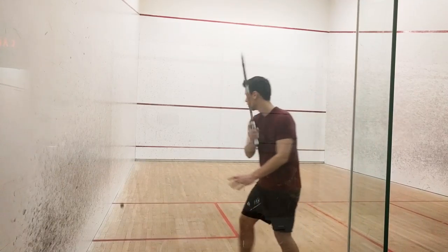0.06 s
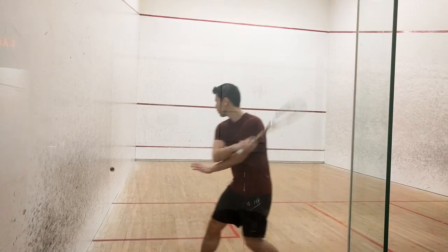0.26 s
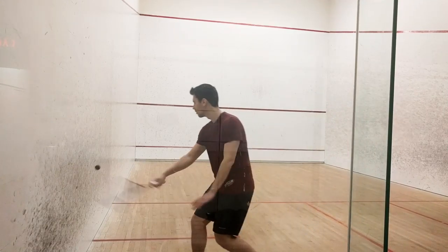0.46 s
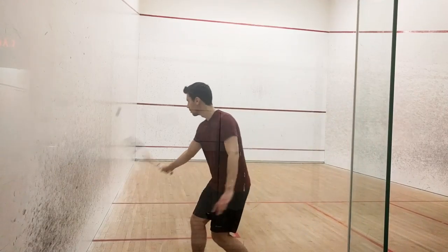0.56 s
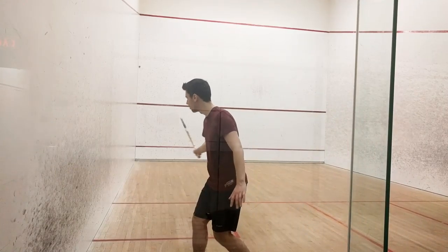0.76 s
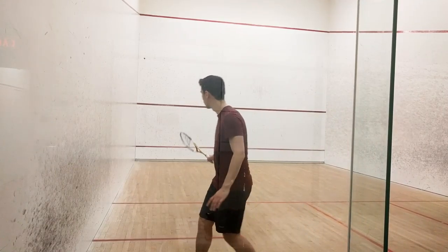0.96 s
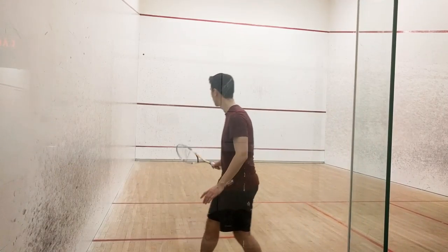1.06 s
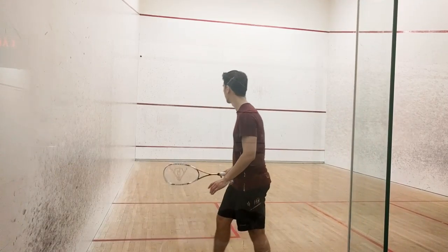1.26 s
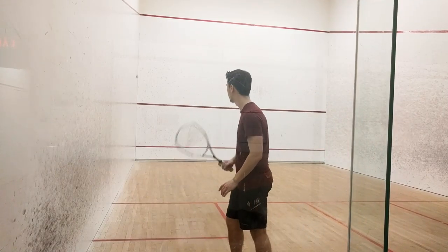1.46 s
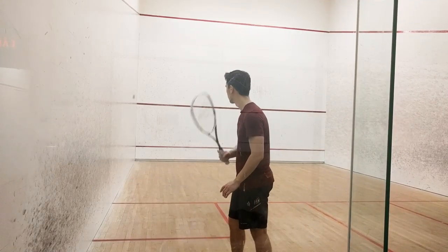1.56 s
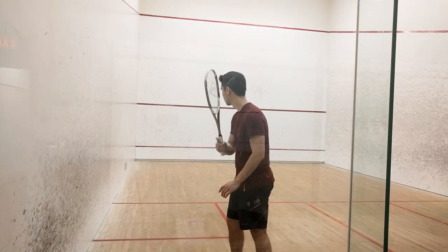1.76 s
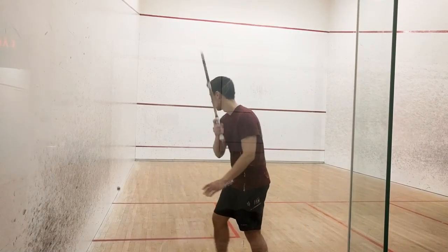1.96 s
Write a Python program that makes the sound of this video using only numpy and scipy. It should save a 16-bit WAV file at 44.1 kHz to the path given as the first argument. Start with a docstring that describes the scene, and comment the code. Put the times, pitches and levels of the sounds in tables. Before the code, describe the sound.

A squash ball ticks off the floor, is hit by a stringed racket, then cracks loudly against the front wall; soft footfalls between, long bright reverberation, faint ventilation, heard in mono from inside the hard court.

```python
"""A squash rally in a hard, closed court, two seconds long, over ventilation and the last shot dying away.
The ball bounces on the floor with a hard tick just after; two footfalls and a push of air follow.
A racket drives the ball, its strings ping, and the ball slams into the front wall. A shoe scuffs faintly,
then comes one more step and a second bounce. Each ball impact is a damped low swing (thump) plus a
sharp noisy edge (crack), with a ring of many reflections; most have distinct early echoes as well."""
import sys
import numpy as np
from scipy import signal
from scipy.fft import rfft, irfft
from scipy.io import wavfile

SR = 44100
rng = np.random.default_rng(int(sys.argv[2]) if len(sys.argv) > 2 else 0)


def waveform_to_disk(signal):
    """Save audio, clipped to [-1, 1], as 16-bit WAV at the path in sys.argv[1]."""
    frames = np.transpose(np.atleast_2d(signal))
    scaled = np.clip(frames, -1, 1) * 32767
    samples = np.round(scaled).astype(np.int16)
    wavfile.write(sys.argv[1], SR, samples)


N = 88200  # length of the scene [samples]


def undb(db):
    """Turn decibels into a plain multiplier."""
    return 10 ** (np.asarray(db) / 20)


def unit(x):
    """Scale a sound to an average (RMS) level of 1."""
    return x / np.sqrt(np.mean(x ** 2))


def fade(t, t60):
    """Decay by 60 dB in t60 seconds."""
    return np.exp(-np.log(1000) * np.maximum(t, 0) / t60)


def hump(t, centre_s, width_s):
    """A smooth rise and fall."""
    return np.exp(-.5 * ((t - centre_s) / width_s) ** 2)


def along(points, hz):
    """Read (frequency [Hz], value) points on a log-frequency axis."""
    p = np.array(points, float)
    return np.interp(np.log(np.maximum(hz, 1)), np.log(p[:, 0]), p[:, 1])


def colour(x, points):
    """Filter to the given (frequency [Hz], level [dB]) shape, without any sound ahead of its cause."""
    size = 2 * N
    shape = undb(along(points, np.fft.rfftfreq(size, 1 / SR)))
    # Folding the cepstrum onto its first half gives a minimum-phase filter
    cepstrum = irfft(np.log(shape))
    cepstrum[1:N] *= 2
    cepstrum[N + 1:] = 0
    response = np.exp(rfft(cepstrum))
    return irfft(rfft(x, size) * response)[:N]


def delay(x, s):
    """Start a sound s seconds later."""
    return np.concatenate([np.zeros(max(int(s * SR), 0)), x])[:N]


def ball():
    """Each impact pushes and cracks the air; nearby surfaces echo it and the far end answers within the ring."""
    # ball impacts: (time [s], what is hit, thump pitch [Hz], thump damping t60 [s], thump level [dB],
    # crack level [dB], ring level [dB], build-up of the ring [s])
    impacts = [(.1166, "floor", 195, .014, -21.5, -10.5, -33, 0.027),
               (0.6292, "racket", 288, 0.01, -20.5, -10, -35, 0.029),
               (1.0765, "wall", 431, 0.0046, -11, -2, -24, 0.016),
               (1.9825, "floor", 217, .01, -26, -9.5, -29.5, .018)]
    # early echoes off the nearest surfaces, levels relative to the impact before them:
    # (time [s], thump level [dB], crack level [dB])
    echoes = [(0.1315, 1, -30), (0.1513, -24, -20), (0.1643, -9, -17), (0.1905, -7, -18), (0.652, -7, -17),
              (0.6912, -10.5, -21), (1.085, -9, -10.5), (1.1, -10, -23), (1.0985, -29, -8),
              (1.1157, -9, -23), (1.1325, -27, -35), (1.1430, -19, -12)]
    # colour of the ring in the court, by what is hit: (frequency [Hz], level [dB])
    ring_colour = {"floor": [(35, -31), (60, -7), (214, -1.5), (309, -10), (339, -18.5), (381, -11.5),
                   (458, -21.5), (1050, -25), (1210, -17), (1330, -17.5), (1450, -24), (4840, -36),
                   (15000, -51.5)], "racket": [(47, -42), (80, -13.5), (177, -5.5), (225, -7), (269, -2),
                   (436, -3), (607, -13), (827, -18.5), (1030, -10), (1310, -3.5), (1600, -18),
                   (2090, -24.5), (2380, -17), (2780, -25), (4410, -22), (6860, -30.5), (7830, -23.5),
                   (15500, -38)], "wall": [(26, -49), (45, -4), (120, -3), (160, -5), (303, 0), (494, -5),
                   (712, -13.5), (1080, -9.5), (1220, -8), (1520, -16.5), (1990, -16), (2670, -22.5),
                   (5040, -26), (5970, -34), (8620, -35), (15500, -46)]}
    # colour of the crack of contact, by what is hit: (frequency [Hz], level [dB])
    crack_colour = {"floor": [(60, -34), (450, -3.5), (700, 3.5), (1300, 1.5), (1750, -5), (2300, -9),
                    (3200, -15), (5000, -8.5), (6500, -21), (8500, -14.5), (11000, -24), (15500, -24)],
                    "racket": [(60, -29), (750, -23), (1050, -5), (1500, -4.5), (2600, -20), (3600, -11.5),
                    (5500, -3.5), (7200, -12), (9000, -8), (11500, -16), (14500, -12.5)],
                    "wall": [(60, -16), (650, -2), (1000, -27), (1800, -8.5), (2600, 0), (3300, 5),
                    (3850, -10), (4700, 2), (6500, -16.5), (8000, -6.5), (10000, -15), (15500, -17)]}
    # roughness of the contact, by what is hit: (grit share [ratio to the edge], grit t60 [s])
    roughness = {"floor": (0.22, 0.013), "racket": (0.36, 0.024), "wall": (0.12, 0.015)}
    # wave back from the far end of the court, by what is hit: (delay [s], width [s], boost of the ring [dB])
    far_return = {"floor": (0.085, 0.011, 1.5), "racket": (0.072, 0.017, 2.7), "wall": (0.078, 0.01, 2.17)}
    # modes of the racket's strings and frame: (frequency [Hz], level [dB], t60 [s])
    strings = [(1039, -33.5, 0.091), (1310, -37.5, 0.13), (1440, -51, 0.081)]
    # colour of the hard tick's crack: (frequency [Hz], level [dB])
    tick_colour = [(200, -19), (1500, -2), (2300, 1), (4000, 0), (6000, -4), (9000, -17), (15000, -20)]
    echo_grit, echo_smear_s = 0.19, 0.011  # walls scatter the crack a little
    tick_s, tick_hz, tick_t60_s = .1410, 2210, 0.0033  # just after the first bounce
    tick_db, tick_crack_db = -31, -19.5

    t = np.arange(N) / SR
    out = np.zeros(N)
    ends = [row[0] for row in impacts[1:]] + [np.inf]
    for (s, kind, hz, t60, thump_db, crack_db, ring_db, build_s), end in zip(impacts, ends):
        body = undb(thump_db) * thump(hz, t60)
        contact = undb(crack_db) * crack(crack_colour[kind], *roughness[kind])
        far_s, width_s, far_db = far_return[kind]
        ring_level = undb(ring_db + far_db * hump(t, far_s, width_s))
        ring = court(ring_colour[kind], build_s) * ring_level
        hit = body + contact + ring
        if kind == "racket":
            hit = hit + sum(undb(db) * mode(f, ring_s) for f, db, ring_s in strings)
        out += delay(hit, s)

        # An echo belongs to the impact just before it
        for echo_s, low_db, high_db in echoes:
            if s < echo_s < end:
                edge = crack(crack_colour[kind], echo_grit, echo_smear_s)
                echo = undb(low_db) * body + undb(crack_db + high_db) * edge
                out += delay(echo, echo_s)

    tick = undb(tick_db) * thump(tick_hz, tick_t60_s)
    tick = tick + undb(tick_crack_db) * crack(tick_colour, *roughness["floor"])
    return out + delay(tick, tick_s)


def thump(hz, t60):
    """A swing of pressure that swells briefly and is quickly damped."""
    t = np.arange(N) / SR
    swell = t * fade(t, t60)
    return -np.sin(2 * np.pi * hz * t) * swell / swell.max()


def crack(points, grit, t60):
    """The sharp edge of contact followed by short, fading noise (grit), of unit energy."""
    x = grit * rng.standard_normal(N) * fade(np.arange(N) / SR, t60)
    x[0] = -1
    x = colour(x, points)
    return x / np.sqrt(np.sum(x ** 2))


def mode(hz, t60):
    """A freely dying vibration: one pure tone that fades."""
    t = np.arange(N) / SR
    return np.sin(2 * np.pi * hz * t) * fade(t, t60)


def court(points, build_s=0.0096):
    """Reflections that crowd ever closer until they merge into a long ring."""
    first_echo_s, dense_s, echoes_per_s = 0.001, .05, 600  # the echo rate grows from echoes_per_s
    bloom_db, bloom_s = 2.5, .06  # the first returns stand above the late ring
    scatter = 0.48  # diffuse sound between the distinct reflections, as a share of their level

    t = np.arange(N) / SR
    # Chance that a reflection lands on each sample; rarer ones are made stronger
    chance = np.clip(echoes_per_s * (1 + (t / dense_s) ** 2) / SR, 1e-4, 1)
    signs = np.sign(rng.standard_normal(N))
    returns = signs * (rng.random(N) < chance) / np.sqrt(chance)
    returns = returns + scatter * rng.standard_normal(N)

    build_up = 1 - np.exp(-np.maximum(t - first_echo_s, 0) / build_s)
    bloom = undb(bloom_db * np.exp(-t / bloom_s))
    return die_away(unit(colour(returns, points))) * build_up * bloom


def die_away(x):
    """Each half-octave band of sound fades at the court's own rate, the high treble fastest."""
    # reverberation time of the court: (frequency [Hz], t60 [s])
    court_t60 = [(60, 0.95), (170, 1.22), (350, 2.28), (700, 2.19), (1300, 1.99), (2500, 2.09),
                 (4500, 1.82), (8000, 0.98), (15000, 0.31)]
    t = np.arange(N) / SR
    f = np.fft.rfftfreq(N, 1 / SR)
    centres = np.geomspace(45, 16000, 18)
    spectrum = rfft(x)
    out = np.zeros(N)
    # Each row of the identity matrix picks one band, which overlaps its neighbours
    for hz, share in zip(centres, np.eye(len(centres))):
        band = irfft(spectrum * along(np.c_[centres, share], f), N)
        out += band * fade(t, along(court_t60, hz))
    return out


def player():
    """Footfalls thud, slap and knock the boards; a lunge pushes the air and a shoe scuffs faintly."""
    # footfalls on the sprung floor: (time [s], thud pitch [Hz], thud level [dB],
    # sole slap level [dB], board knock level [dB], ring level [dB])
    steps = [(0.3952, 182, -32, -15, -45, -44), (0.451, 210, -30, -42, -49, -52),
             (1.9720, 148, -22, -18.5, -31.5, -41)]
    # colour of the ring after a step: (frequency [Hz], level [dB])
    step_ring = [(50, 0), (130, 3.5), (250, 10.5), (450, -8), (1000, -3), (2000, -26), (6000, -32),
                 (15000, -56)]
    # colour of the slap of a shoe: (frequency [Hz], level [dB])
    sole = [(100, -1), (500, -1), (900, 3), (1300, -5), (2000, -8), (4000, -25), (7000, -41), (15000, -58)]
    step_t60_s, board_hz, board_t60_s = 0.013, 474, 0.084
    swing_s, swing_width_s, swing_db = 0.458, 0.013, -32.5  # push of air as the player lunges
    scuff_s, scuff_width_s, scuff_db = 1.49, .016, -69.5  # faint high scuff of a shoe

    t = np.arange(N) / SR
    out = np.zeros(N)
    for s, hz, thud_db, slap_db, board_db, ring_db in steps:
        thud = undb(thud_db) * thump(hz, step_t60_s)
        slap = undb(slap_db) * crack(sole, grit=0.42, t60=0.026)
        knock = undb(board_db) * mode(board_hz, board_t60_s)
        ring = undb(ring_db) * court(step_ring)
        out += delay(thud + slap + knock + ring, s)

    push = undb(swing_db) * hump(t, swing_s, swing_width_s)
    hiss = unit(colour(rng.standard_normal(N), [(5000, -27), (10000, -4), (14000, -7)]))
    scuff = undb(scuff_db) * hiss * hump(t, scuff_s, scuff_width_s)
    return out + push + scuff


def background():
    """Steady coloured noise for the ventilation, and fading noise for the ring of the shot before."""
    # colour of the ventilation: (frequency [Hz], level [dB])
    air_colour = [(20, 5.5), (35, -3.5), (60, -13), (120, -17), (350, -22), (700, -25.5), (1300, -17),
                  (2500, -33.5), (5000, -48.5), (8000, -59.5), (15000, -55)]
    # colour of the previous shot's ring: (frequency [Hz], level [dB])
    last_shot_colour = [(120, -46), (200, -13), (569, -4.5), (829, -19), (1070, -5), (1590, -25),
                        (1670, -24), (3680, -33.5), (5270, -37.5), (12000, -48), (15600, -65),
                        (22000, -120)]
    air_db, last_shot_db = -46.5, -51
    air = undb(air_db) * unit(colour(rng.standard_normal(N), air_colour))
    last_shot = die_away(unit(colour(rng.standard_normal(N), last_shot_colour)))
    return air + undb(last_shot_db) * last_shot


def scene():
    """Add the ball, the player and the background into one channel."""
    return (ball() + player() + background())[None]


def record(dry):
    """A steep low-pass filter cuts the very top of the treble."""
    top_hz = 16300
    low_pass = signal.ellip(10, .2, 80, top_hz, fs=SR, output="sos")  # ripple 0.2 dB, cut 80 dB
    return signal.sosfilt(low_pass, dry)


dry = scene()
out = record(dry)
waveform_to_disk(out)
```